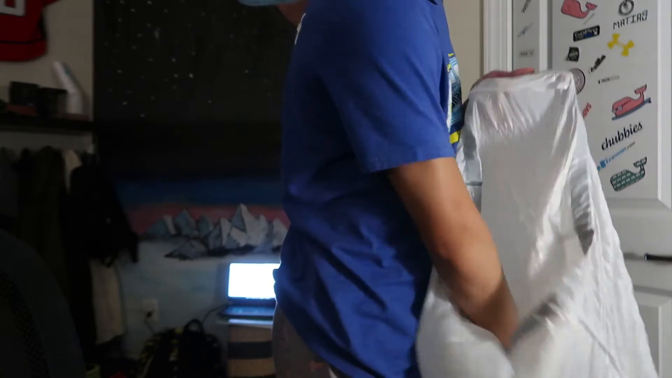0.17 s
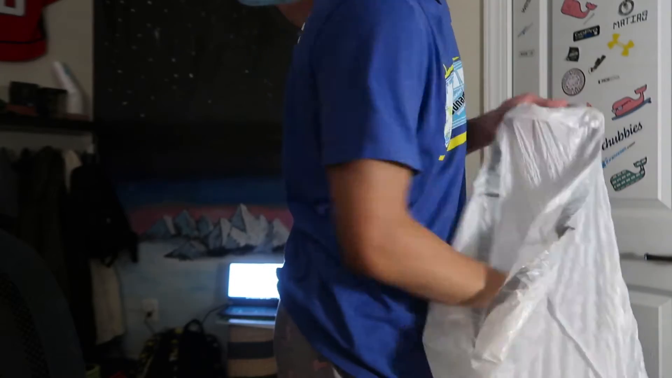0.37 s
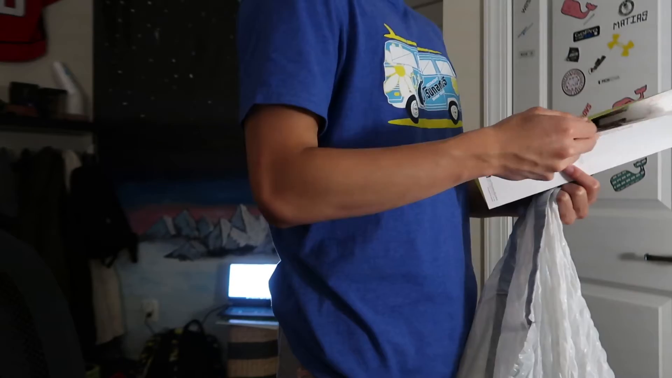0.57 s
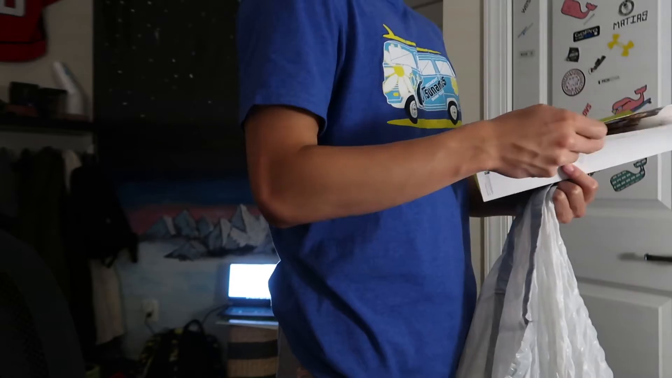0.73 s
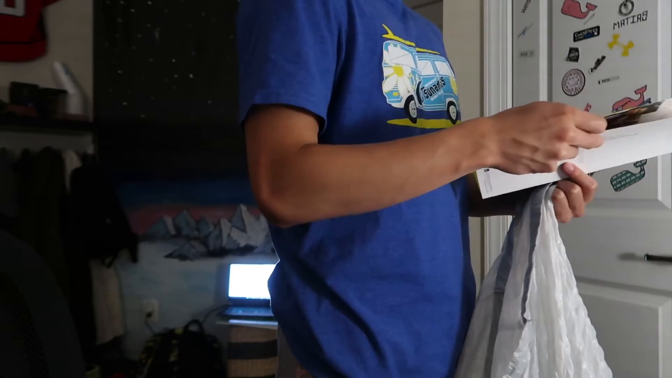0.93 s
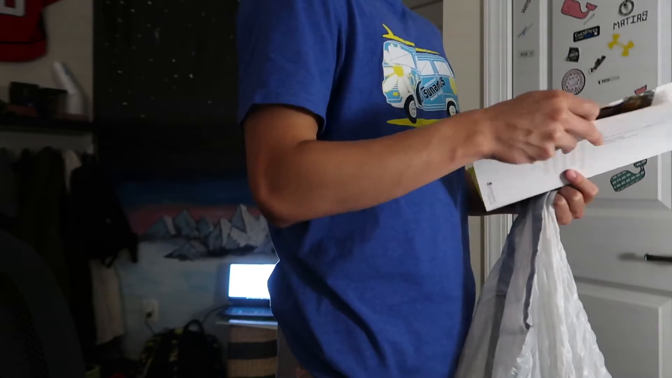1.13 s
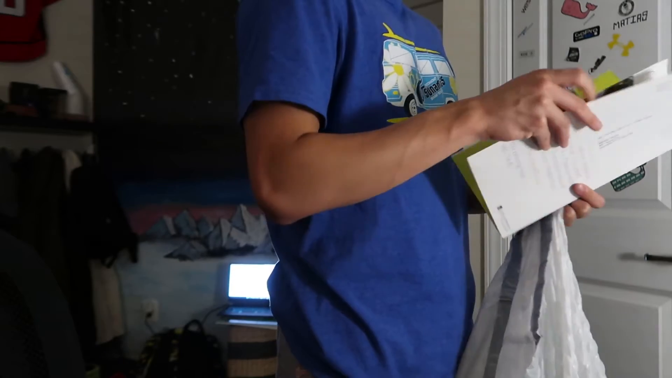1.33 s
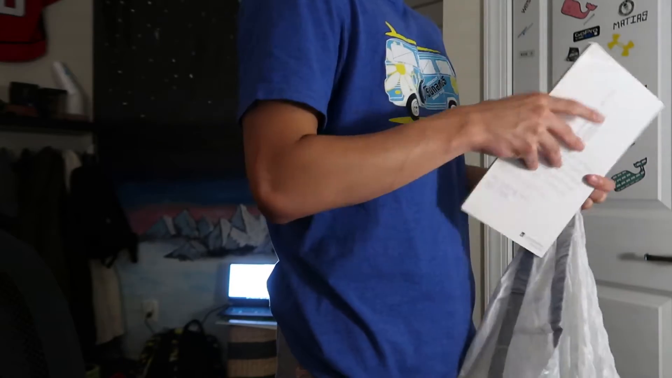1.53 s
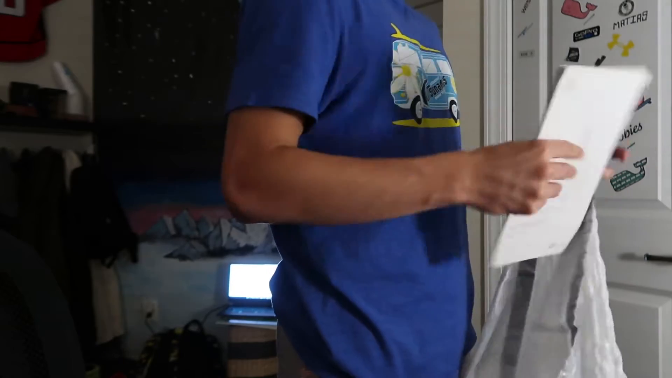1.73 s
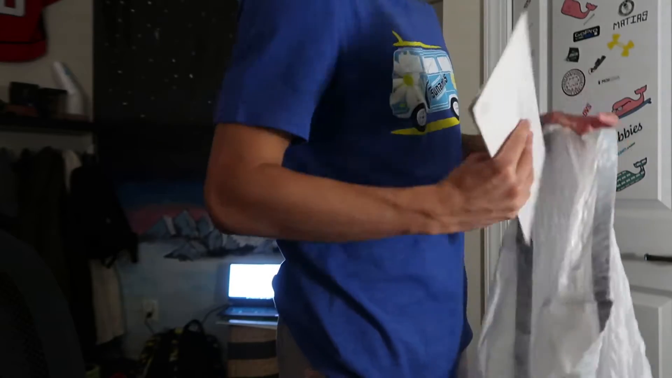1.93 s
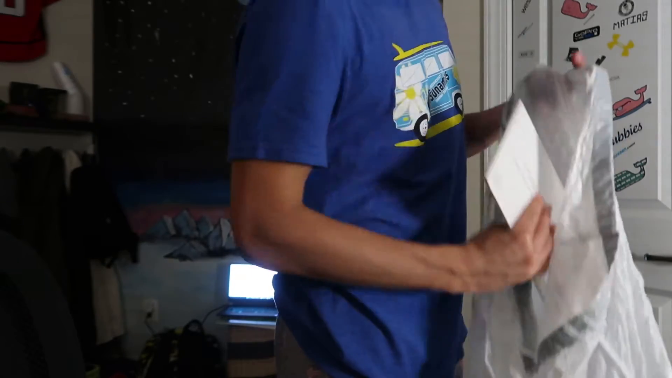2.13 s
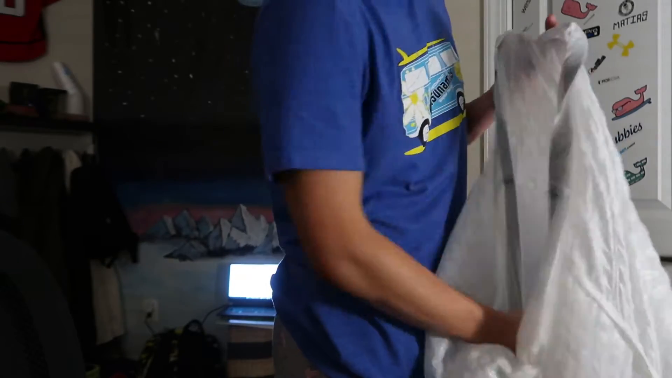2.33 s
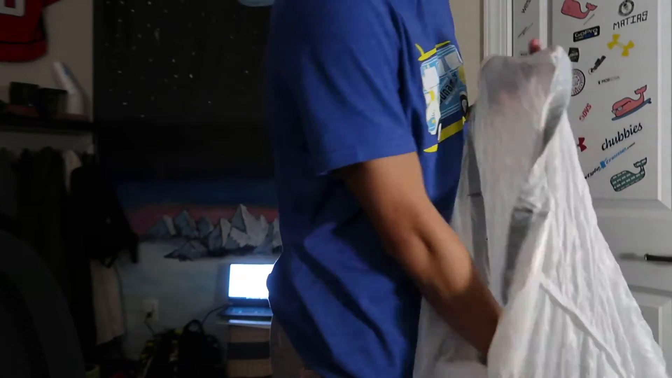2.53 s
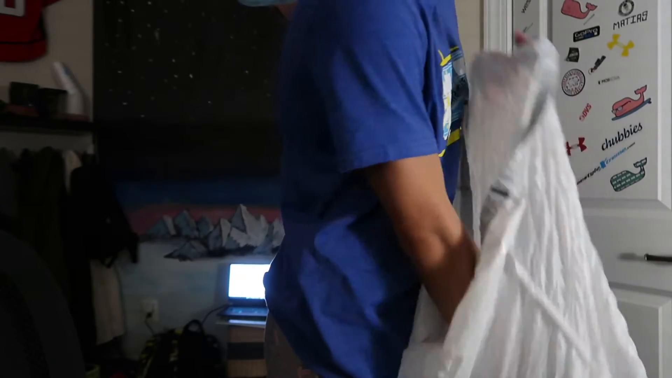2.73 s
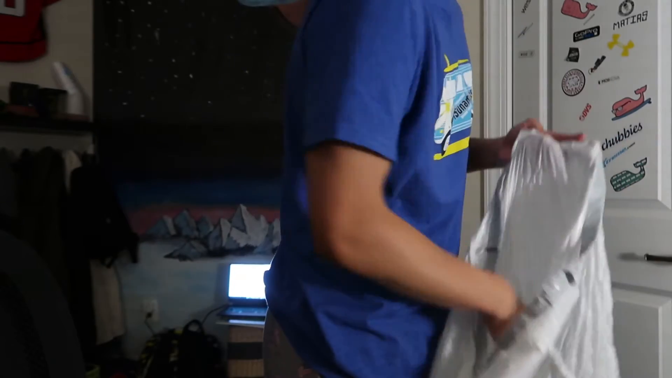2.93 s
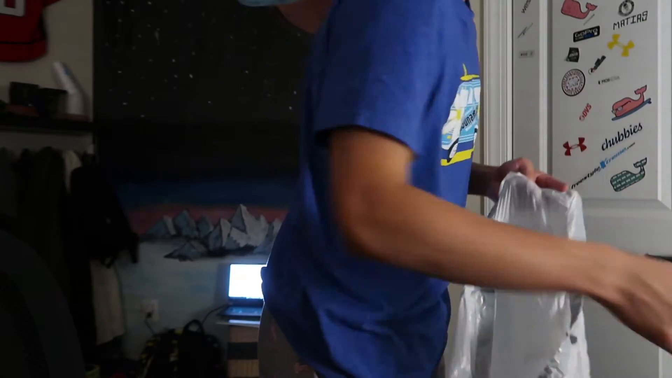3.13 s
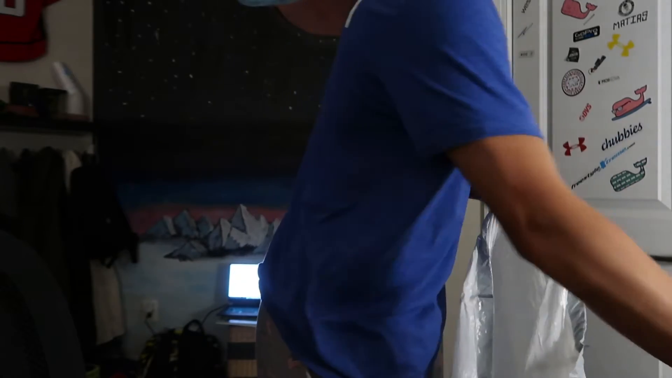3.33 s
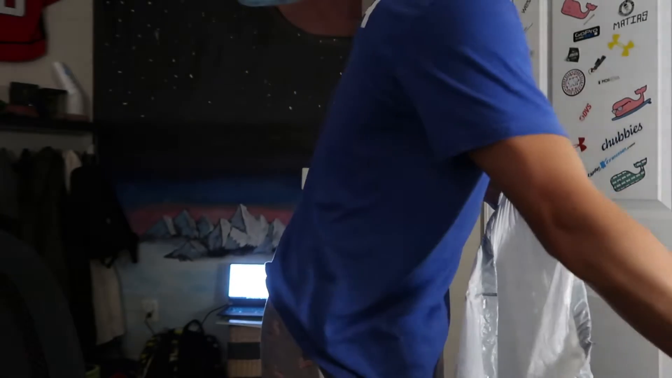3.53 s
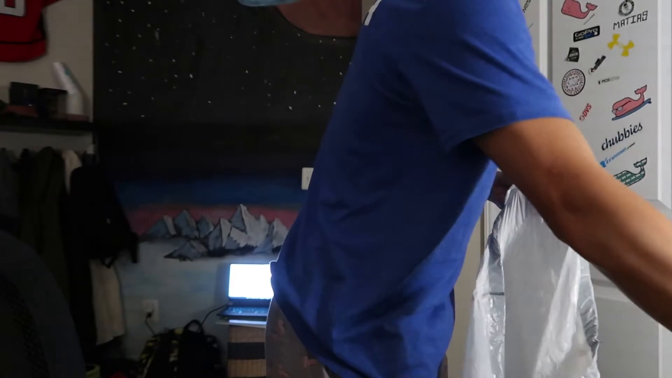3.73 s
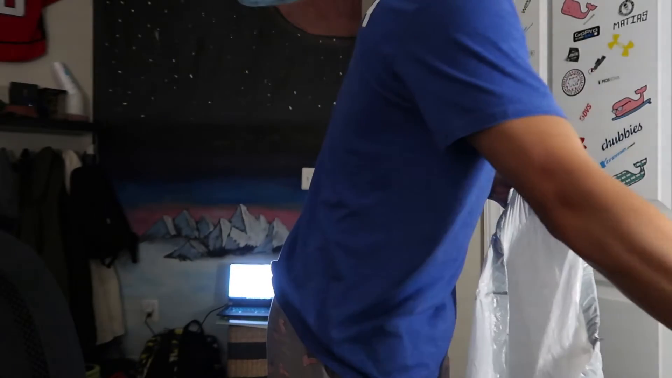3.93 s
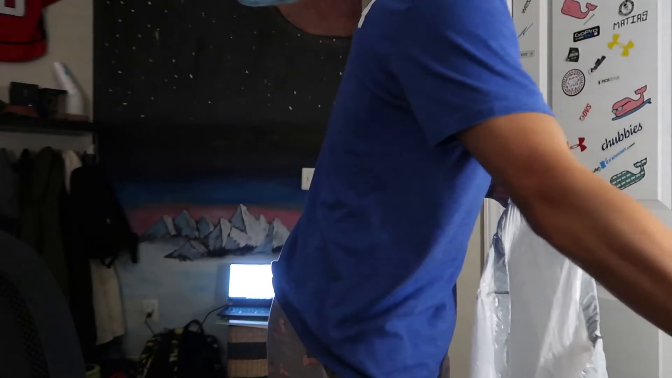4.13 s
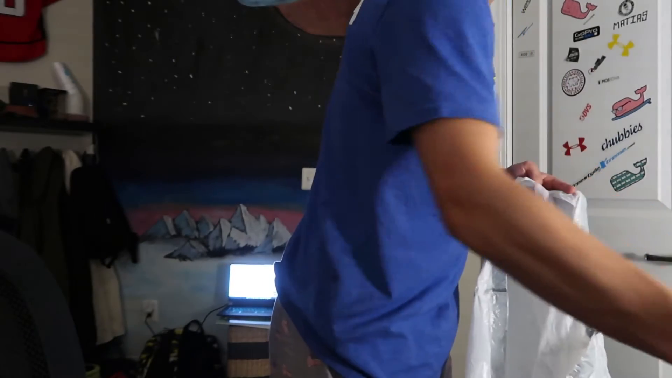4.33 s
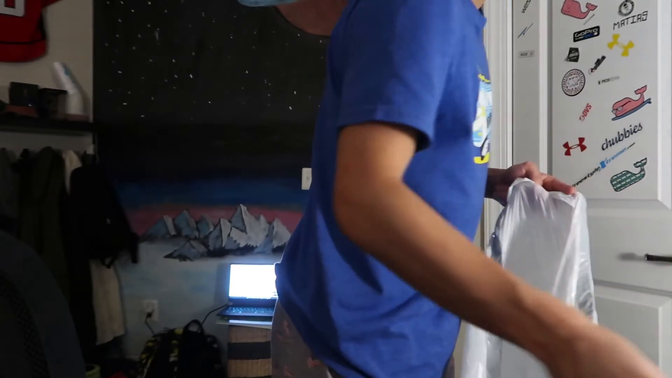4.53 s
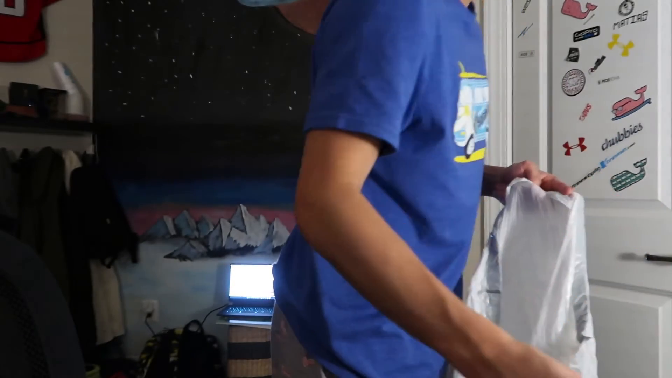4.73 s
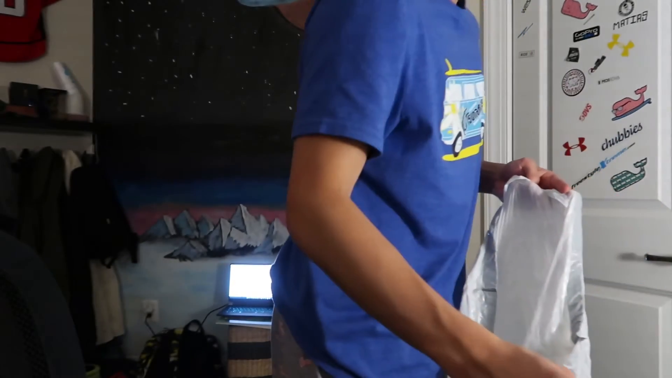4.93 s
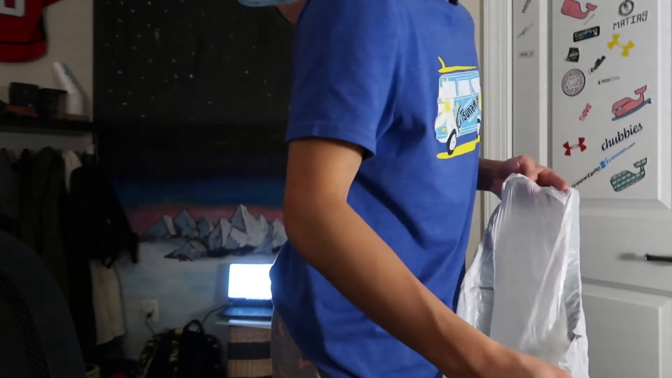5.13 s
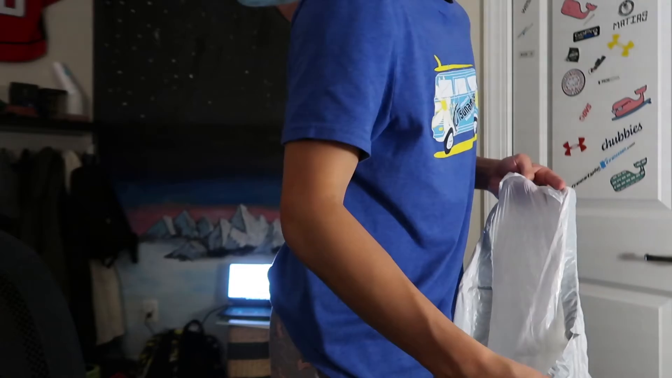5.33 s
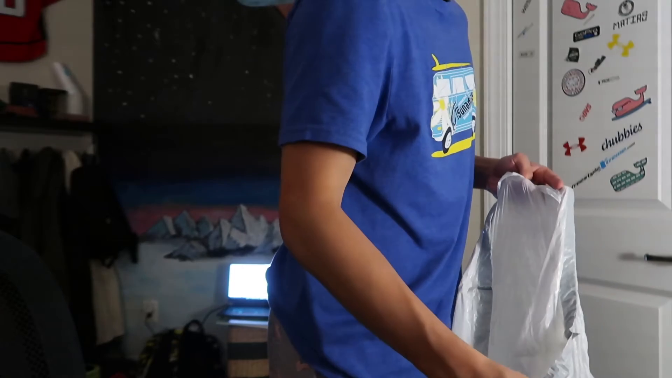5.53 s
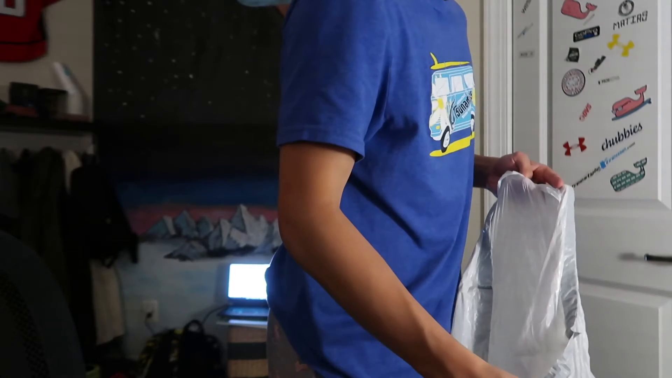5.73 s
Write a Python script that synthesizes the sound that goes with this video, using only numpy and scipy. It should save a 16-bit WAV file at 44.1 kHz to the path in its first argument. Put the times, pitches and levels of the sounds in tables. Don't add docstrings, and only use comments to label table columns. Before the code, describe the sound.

In a small furnished room with a low hum, a thin plastic bag is crumpled hard and close, then cut off abruptly. Paper is handled softly, with one crisp snap, and pushed into the bag with a strong crinkle and puff of air. Small hard things then knock and rattle on a hollow desk, a metal piece bounces, and a hollow object slides faintly. Close stereo camera microphone.

```python
import sys
import numpy as np
from scipy import signal
from scipy.fft import rfft, irfft, next_fast_len
from scipy.io import wavfile
from scipy.ndimage import uniform_filter1d, map_coordinates

SR = 44100
rng = np.random.default_rng(int(sys.argv[2]) if len(sys.argv) > 2 else 0)


def boost(x):
    u = np.asarray(x, float) / 20
    return 10 ** u


def generate_wav(sig):
    pcm = np.round(np.clip(np.atleast_2d(sig).T, -1, 1) * 32767).astype(np.int16)
    wavfile.write(sys.argv[1], SR, pcm)


N = 254456
SCENE_CHANGE_S = 0.502

# (frequency [Hz], level [dB per Hz])
AIR_MID = [(12, -41), (20, -7.5), (70, -4.5), (119, -3), (238, -11), (298, -8), (565, -15.5), (857, -16.5),
           (1340, -20), (3750, -24), (9660, -37.5), (12400, -35), (13500, -41), (15500, -74)]
# (frequency [Hz], level [dB per Hz])
AIR_SIDE = [(12, -65), (20, -39), (140, -11), (196, -5.5), (372, -3), (705, -10), (1070, -10), (6360, -22),
            (13100, -30), (15500, -64)]
# (frequency [Hz], level [dB per Hz])
FILM = [(88, -28), (150, -6), (244, -7), (381, -3), (583, -6), (668, -2), (722, -5), (1040, -3.5),
        (2600, 1.5), (6350, -14), (8660, -23), (10300, -26.5), (12800, -30), (15500, -42)]
# (time [s], effort [dB], tautness [dB])
EFFORT = [(.5, -70, -15), (1.3, -77, -18), (1.68, -53.5, -13), (1.95, -48.5, -2), (2.37, -42, -7),
          (2.66, -40, -13), (3.11, -40.5, -7.5), (3.28, -56, -14), (3.44, -57, -15), (3.48, -30, -11.5),
          (3.75, -56, -11.5), (4.2, -57, -1.5), (4.59, -43, -10), (4.86, -43, -20), (5.14, -53.5, -11),
          (5.3, -49.5, -10), (5.55, -72, -30), (5.77, -54, -9)]
# (peak time [s], crinkle [dB], swell [s], fade [s], bulk over crinkle [dB])
GRABS = [(.052, -24.5, 0.16, 0.06, -13.5), (.16, -25.5, 0.067, 0.09, -28), (.33, -22, 0.58, 0.1, -4),
         (.486, -28, 0.014, 0.059, 0.5), (.46, -37, .4, .2, -6.5), (.53, -63, 0.013, 0.11, 10),
         (.65, -52.5, 0.039, 0.35, -7), (.74, -48.5, .2, 0.12, -9), (1.37, -48.5, 0.17, 0.061, -16),
         (1.405, -30, 0.021, .07, -26), (1.65, -51.5, 0.27, 0.051, -2), (1.73, -44, 0.033, 0.06, -4),
         (1.89, -41.5, 0.24, .05, -20), (1.91, -37.5, .04, 0.05, -13.5), (2.42, -22, 0.015, 0.054, 1.5),
         (2.455, -19.5, 0.078, 0.083, -6.5), (2.79, -33.5, 0.14, 0.067, -6), (2.97, -45, 0.085, 0.091, 3),
         (4.1, -42.5, 0.45, 0.02, -12), (5.38, -37, 0.078, 0.11, -7.5)]
# (time [s], rumble [dB], fade [s])
SETTLING = [
    (3.482, -26.5, 0.12),
    (3.8, -38.5, 0.12),
    (4.002, -31, 0.069),
    (4.22, -39, 0.11),
    (4.603, -30, 0.038),
    (4.702, -26.5, 0.13),
    (5.08, -34.5, 0.072),
    (5.42, -45, 0.33),
    (5.639, -44, 0.13),
]
# (time [s], peak [dB], thud over peak [dB], edge over peak [dB])
SNAPS = [(0.0189, -13, -25, -18), (0.033, -11, -20, -21), (0.0482, -6.5, -17, -21),
         (0.1176, -9.5, -27, -18), (0.1356, -15, -22, -4), (0.157, -10, -21, -3.5), (0.227, -7, -6, -5),
         (.234, -8.5, -15, 2), (.241, -10.5, -10, 0), (0.3016, -2.5, -9, -13), (0.4836, -18, -2, -22),
         (1.3753, -30, -27, -22), (1.3937, -11, -34, -31), (1.718, -29, -17, -24), (1.8755, -25, -10, -18),
         (1.8954, -21.5, -15, -15), (1.9954, -21.5, -29, -6), (2.1208, -21, -30, -24),
         (2.238, -23, -23, -6), (2.2987, -35, -26, -8), (2.417, -8, -5, -21), (2.4409, -3.5, -6, -40),
         (2.572, -18, -5, -6), (2.759, -17, -24, -27), (2.943, -18, -17, -6.5), (3.4417, -19.5, 4.5, 0)]
# (time [s], peak [dB], pitch [Hz], t60 [s])
TICKS = [(.05, -8, 3320, 0.2), (.154, -6.5, 2120, 0.034), (.306, -9, 1300, .25), (.484, -13, 2740, 0.023),
         (1.392, -15.5, 2814, 0.16), (1.718, -30, 3530, .03), (2.299, -17.5, 3530, 0.026),
         (2.414, -9.5, 1150, 0.022), (2.44, -9, 1800, 0.17), (2.942, -27, 3000, .03), (3.471, -17, 607, .1),
         (3.471, -9, 1660, 0.026), (3.556, -21.5, 2700, 0.11), (3.658, -29, 497, 0.079),
         (3.8, -13.5, 679, 0.27), (3.928, -7.5, 2380, 0.0091), (3.97, -20.5, 910, 0.022),
         (4.209, -9, 1450, .03), (4.697, -11.5, 1160, 0.064), (4.744, -15, 1200, 0.035),
         (4.78, -21, 2600, .15), (4.813, -23.5, 994, 0.09), (4.964, -20, 2660, 0.042),
         (5.073, -27, 856, 0.16), (1.402, -13.5, 2697, 0.19), (4.003, -26, 545, 0.18),
         (.068, -11, 3250, .08), (3.49, -17, 4800, .3), (4.215, -22, 1200, .2), (5.085, -24, 900, .15)]
# (peak time [s], level [dB], swell [s], fade [s])
PUFFS = [
    (.33, -42.5, 0.06, 0.08),
    (1.73, -45.5, .05, 0.084),
    (2.46, -40.5, 0.15, 0.31),
    (2.8, -43.5, 0.11, .15),
    (5.42, -48, .03, .08),
]
# (time [s], peak [dB], thud over peak [dB], edge over peak [dB], t60 [s])
KNOCKS = [(3.442, -18, 1, -10, 0.39), (3.471, -12.5, 2, -7, 0.13), (3.799, -14, 0, -11.5, 0.18),
          (3.92, -26, -9, 2, .1), (3.928, -12, -10, -5.5, 0.085), (3.971, -26.5, 4, -29, 0.45),
          (4.002, -23, -12, -10, 0.28), (4.144, -40, -13, 2, 0.14), (4.21, -28.5, 6.5, -38, 0.07),
          (4.44, -33, 0.5, -32, 0.2), (4.599, -14, -22, -5.5, 0.25), (4.697, -11.5, 2, -7, 0.094),
          (4.744, -16.5, 1.5, -5.5, 0.12), (4.782, -20.5, -1.5, -11, 0.16),
          (4.964, -18.5, -34, -19.5, 0.32), (5.073, -57, 8, -35, 0.12), (5.422, -29, 5, -25, 0.096),
          (5.604, -23, -11, -20, 0.2), (5.642, -29.5, -18, -19, 0.32)]
# (frequency [Hz], width [Hz], level [dB])
DESK = [(555, 93, 12), (1235, 64, 7), (1660, 36, -1), (2027, 68, 1), (2600, 83, -6), (3420, 31, -53)]
# (peak time [s], level [dB], swell [s], fade [s])
NUDGES = [
    (4.468, -53, 0.028, 0.21),
    (4.6, -37.5, 0.011, .065),
    (4.7, -49, 0.016, 0.21),
    (4.986, -69, .06, .04),
    (5.085, -50, .04, .1),
    (5.5, -51.5, 0.63, 0.18),
    (5.694, -39, 0.22, 0.043),
]
# (time [s], level [dB])
CLINKS = [
    (4.597, -8.5),
    (4.605, -13),
    (4.631, -23),
    (4.645, -26),
    (4.685, -34),
    (4.715, -38),
]
# (frequency [Hz], level [dB], t60 [s])
METAL = [(3357, -2, 0.042), (3400, -20, 0.027), (3640, -21, 0.05), (4420, -28, 0.14), (5500, -27, .05),
         (6680, -17.5, 0.057), (7460, -24, 0.031), (9200, -27, 0.022)]
# (frequency [Hz], t60 [s])
ROOM = [(200, 0.4), (2000, 0.31), (10000, 0.41)]
# (frequency [Hz], side minus mid [dB])
PORTS = [(60, -49), (110, -45), (200, -55), (380, -43), (700, -21), (1290, -17.5), (2380, -13), (4400, -1),
         (8120, 4.5), (15000, 6.5)]


def unit(x):
    return x / np.sqrt(np.mean(x ** 2) + 1e-20)


def along(points, hz):
    f, v = np.transpose(points)
    return np.interp(np.log(hz + 1), np.log(f + 1), v)


def curves(rows):
    s, *cols = np.transpose(rows)
    return [np.interp(np.arange(N) / SR, s, c) for c in cols]


def wobble(rate):
    knots = rng.standard_normal(int(N * 200 / SR) + 4)
    return map_coordinates(knots, [np.arange(N) * min(rate, 200) / SR])


def filtered(x, response):
    m = next_fast_len(N + SR // 2)
    return irfft(rfft(x, m) * response(np.fft.rfftfreq(m, 1 / SR)), m)[..., :N]


def noise_through(response):
    return unit(filtered(rng.standard_normal(N), response))


def thirds(x, colour):
    low = lambda f: 1 / (1 + (f / 1200) ** 6)
    high = lambda f: 1 / (1 + (4500 / (f + 1)) ** 6)
    middle = lambda f: 1 - low(f) - high(f)
    return np.array([unit(filtered(x, lambda f: part(f) * colour(f))) for part in (low, middle, high)])


def gesture(s, db, swell, fade):
    t = np.arange(N) / SR - s
    slope = np.where(t < 0, -t / max(swell, .002), t / max(fade, .002))
    same_scene = (t + s < SCENE_CHANGE_S) == (s < SCENE_CHANGE_S)
    return boost(2 * (db - 20 * slope)) * same_scene


def creases(per_second, spread_db, rub):
    chance = per_second / SR * boost(6.6 * wobble(40))
    soft = 1 / (1 + np.exp((rng.random(N) / chance - 1).clip(-20, 20) * 8))
    size = boost(spread_db * rng.exponential(1, N).clip(0, 1.6))
    pops = soft * size * rng.standard_normal(N)
    return unit(pops) + rub * rng.standard_normal(N)


def film_colour(f):
    return boost(along(FILM, f))


def blows(events, colour, crack, slower_bass):
    t = np.arange(SR // 3) / SR
    onset = 1 - np.exp(-t / 0.00095)
    shape = np.zeros((3, N + len(t)))
    for s, db, thud_db, edge_db, t60 in events:
        bands = [(thud_db, slower_bass), (0, 1), (edge_db, .7)]
        for band, (level, life) in enumerate(bands):
            rattle_fade = boost(-60 * t / (max(t60, .01) * life))
            crack_fade = crack * boost(-60 * t / (0.0077 * life))
            shape[band, round(s * SR):][:len(t)] += boost(db + level - 19) * (rattle_fade + crack_fade) * onset
    rattle = thirds(creases(per_second=1730, spread_db=-4.0, rub=1.42), colour)
    return sum(shape[:, :N] * rattle)


def air():
    t = np.arange(N) / SR
    mid = boost(-53.0) * noise_through(lambda f: boost(along(AIR_MID, f)))
    side = boost(-58) * noise_through(lambda f: boost(along(AIR_SIDE, f)))
    hum = boost(-57.0 + 1.4 * wobble(12)) * np.sin(2 * np.pi * 118.4 * t + 1.6 * wobble(14))
    whine = boost(-90) * np.sin(2 * np.pi * 13001 * t)
    centre = mid + hum + whine
    return np.array([centre + side, centre - side])


def patchy(x, depth_db):
    z = signal.stft(x, nperseg=256)[2]
    field = uniform_filter1d(rng.standard_normal(z.shape), size=6, axis=0)
    field = uniform_filter1d(field, size=8, axis=1)
    return signal.istft(z * boost(depth_db * unit(field)), nperseg=256)[1][:N]


def rustle():
    effort_db, taut_db = curves(EFFORT)
    flat = 0 * taut_db
    tilt_db = np.array([flat - 6, flat, taut_db])
    power = boost(2 * effort_db) * (np.arange(N) > SCENE_CHANGE_S * SR) * boost(2 * tilt_db)
    settle_swell_s, settle_bulk_db = 0.007, 13
    settling = [(s, db - settle_bulk_db, settle_swell_s, fade, settle_bulk_db) for s, db, fade in SETTLING]
    for s, db, swell, fade, bulk_db in GRABS + settling:
        crisp_db = -10 - 0.055 * (db + 45)
        power = power + gesture(s, db, swell, fade) * boost(2 * np.array([[bulk_db], [0], [crisp_db]]))
    crinkle = patchy(creases(per_second=1330, spread_db=2, rub=1.54), depth_db=1.8)
    bulk, middle, crisp = np.sqrt(power) * thirds(crinkle, film_colour)
    flutter_db = 1.2 * wobble(30) + 0.53 * wobble(90)
    bulk = boost(2 * wobble(25.193)) * bulk
    crisp = boost(1.3 * wobble(24.9)) * crisp
    return boost(-3.5 + flutter_db) * (bulk + middle + crisp)


def snaps():
    t60_s = 0.072
    return blows([(*row, t60_s) for row in SNAPS], film_colour, crack=2.4, slower_bass=0.9)


def ticks():
    partials, pitch_scatter = 14, .15
    out, t = np.zeros(N + SR), np.arange(SR // 4) / SR
    chances = rng.standard_normal((len(TICKS), partials)).clip(-2, 2)
    for (s, db, hz, t60), chance in zip(TICKS, chances):
        blur = .035 * np.sqrt(hz / 1000)
        wander = blur * np.cumsum(rng.standard_normal((partials, len(t))), axis=1)
        pitches = hz * np.exp(pitch_scatter * chance)[:, None]
        cluster = np.sin(2 * np.pi * pitches * t + wander).sum(0) / 7
        out[round(s * SR):][:len(t)] += boost(db - 10 - 60 * t / max(t60, .005)) * cluster
    return out[:N]


def resonant_breath(moves, hz, width_hz):
    tone = noise_through(lambda f: 1 / (1 + ((f - hz) / width_hz) ** 2))
    return np.sqrt(sum(gesture(*row) for row in moves)) * tone


def puffs():
    return resonant_breath(PUFFS, hz=115, width_hz=40)


def desk_colour(f):
    body = 0
    for k, (centre, width, db) in enumerate(DESK):
        resonance = 1j * f * width / (centre * centre - f * f + 1j * f * width)
        body = body + (-1) ** k * boost(db) * resonance
    top_loss = 1 + (f / 10000) ** 4
    return (0.66 + 1.2 * body) * film_colour(f) / top_loss


def knocks():
    return blows(KNOCKS, desk_colour, crack=2.5, slower_bass=1.32)


def hollow():
    return resonant_breath(NUDGES, hz=485, width_hz=26)


def metal():
    out, t = np.zeros(N + SR), np.arange(SR // 4) / SR
    onset = 1 - np.exp(-t / 0.00082)
    for s, db in CLINKS:
        ring = 0
        for hz, level, t60 in METAL:
            ring = ring + boost(level + rng.normal(0, 3.1) - 60 * t / t60) * np.sin(2 * np.pi * hz * t)
        out[round(s * SR):][:len(t)] += boost(db) * ring * onset
    return out[:N]


def room(x):
    hz, t, z = signal.stft(rng.standard_normal((2, SR // 2)), SR, nperseg=256)
    tail = signal.istft(z * boost(-60 * t / along(ROOM, hz)[:, None]), SR, nperseg=256)[1]
    tail = tail / np.linalg.norm(tail[0])

    def echo(v):
        delayed = np.pad(v, (200, 0))[None]
        return signal.fftconvolve(delayed, tail, axes=1)[:, :N]

    before = np.arange(N) < SCENE_CHANGE_S * SR
    return echo(x * before) * before + echo(x * ~before)


def scene():
    near = rustle() + snaps() + ticks() + puffs() + knocks() + hollow() + metal()
    near[round(SCENE_CHANGE_S * SR):round(.51 * SR)] *= .1
    wall_mid, wall_side = room(near)
    mid = near + boost(-8.5) * wall_mid
    near_side = filtered(near, lambda f: (-.9j - .1) * boost(along(PORTS, f)) - .06)
    side = near_side + boost(-8) * filtered(wall_side, lambda f: boost(along(PORTS, f)))
    return np.array([mid + side, mid - side]) + air()


def band_limit(x):
    return signal.sosfilt(signal.butter(12, 15690, fs=SR, output="sos"), x)


def record(dry):
    return band_limit(dry)


dry = scene()
out = record(dry)
generate_wav(out)
```